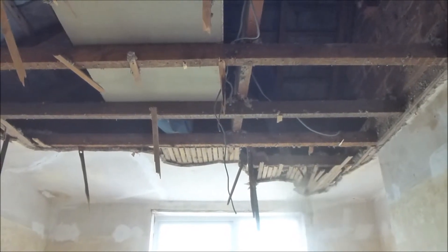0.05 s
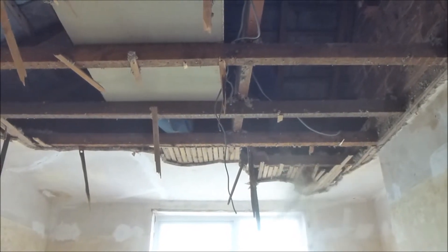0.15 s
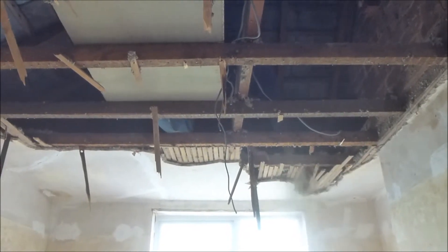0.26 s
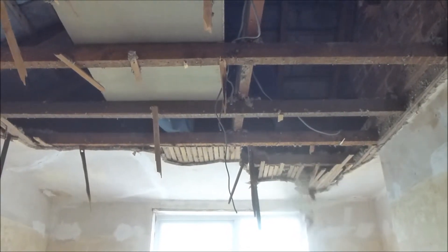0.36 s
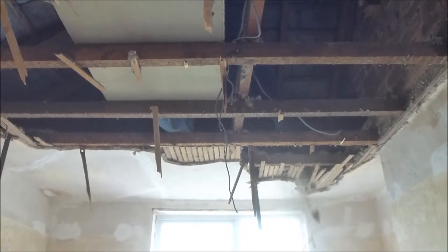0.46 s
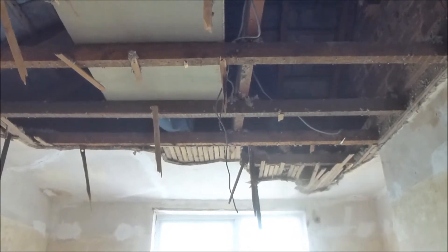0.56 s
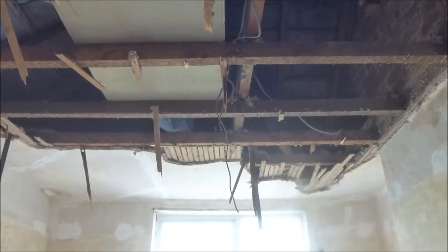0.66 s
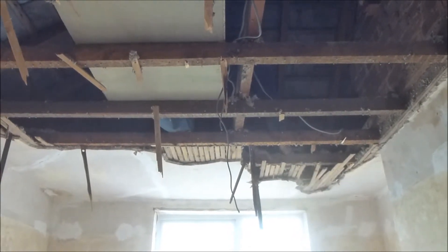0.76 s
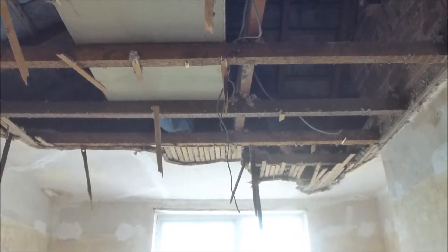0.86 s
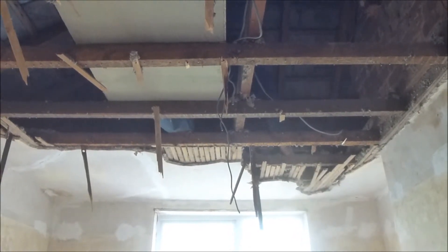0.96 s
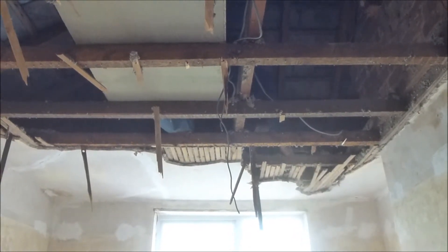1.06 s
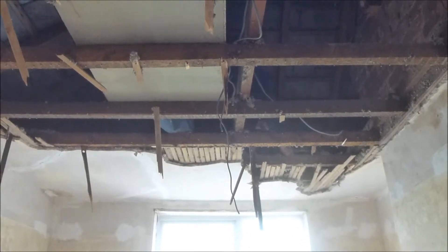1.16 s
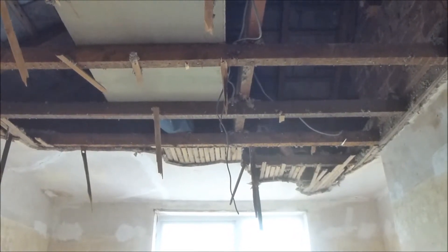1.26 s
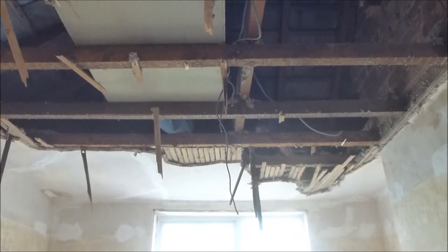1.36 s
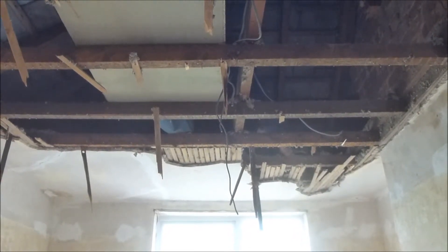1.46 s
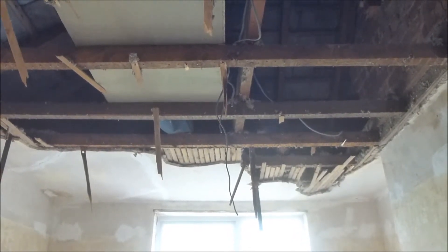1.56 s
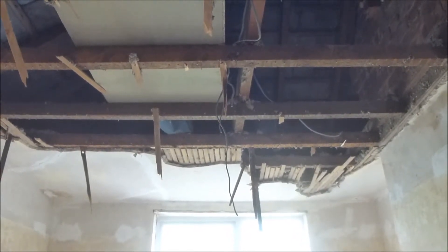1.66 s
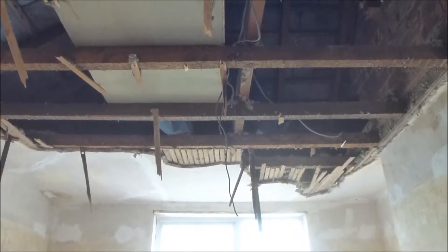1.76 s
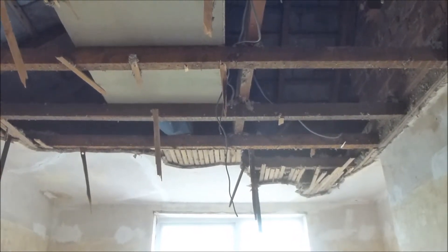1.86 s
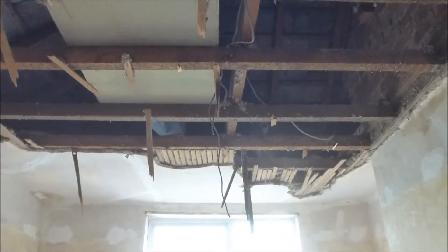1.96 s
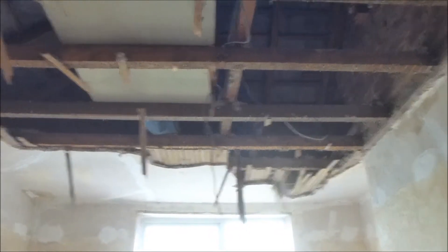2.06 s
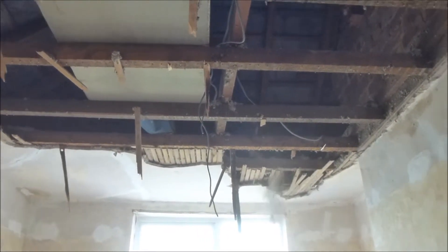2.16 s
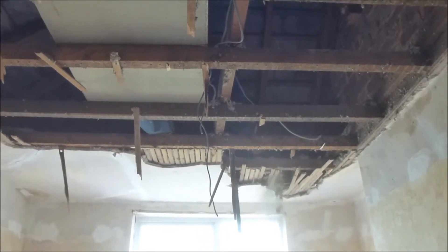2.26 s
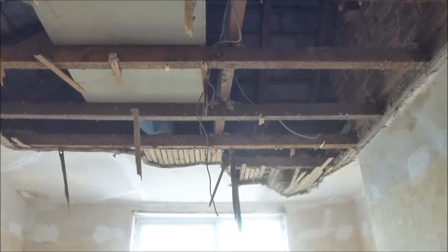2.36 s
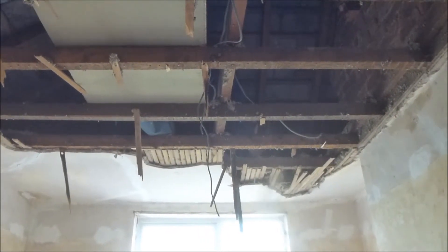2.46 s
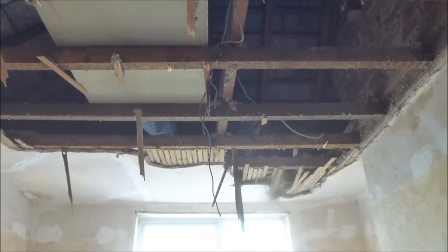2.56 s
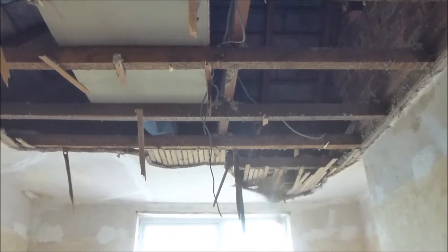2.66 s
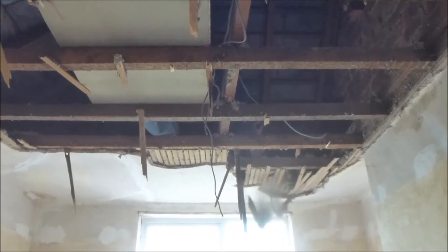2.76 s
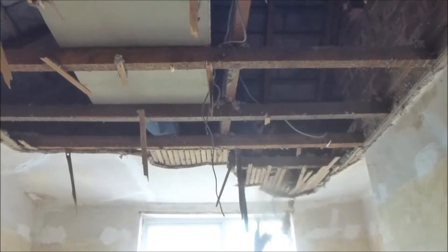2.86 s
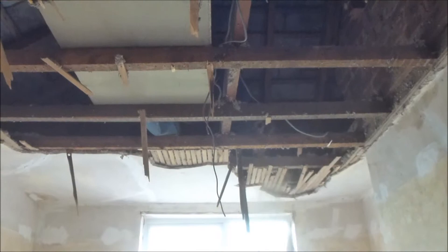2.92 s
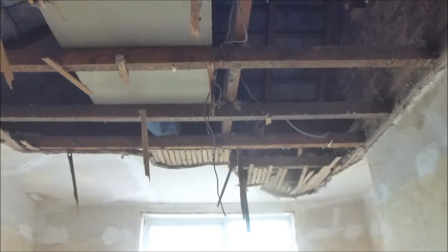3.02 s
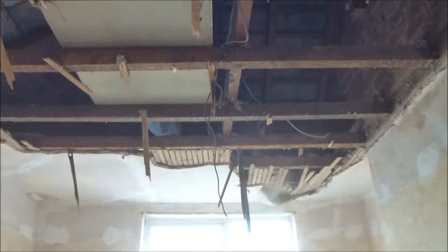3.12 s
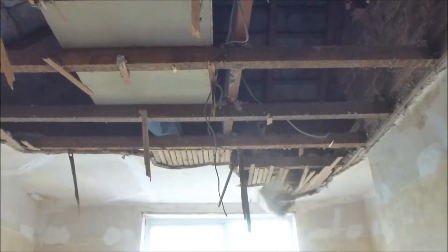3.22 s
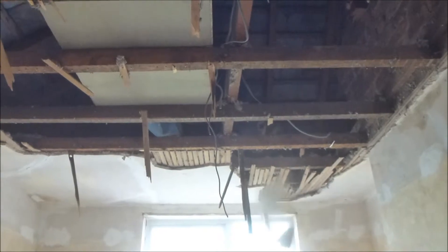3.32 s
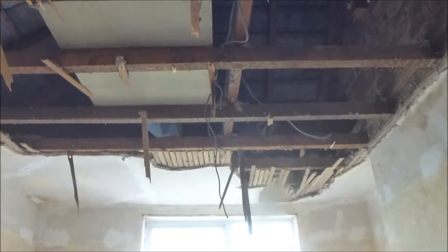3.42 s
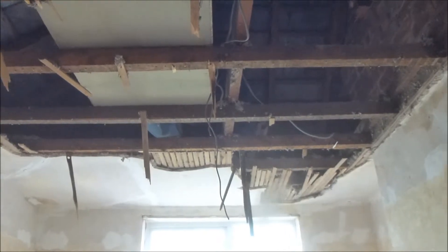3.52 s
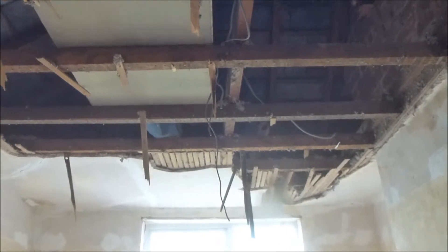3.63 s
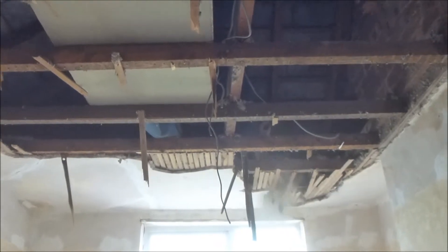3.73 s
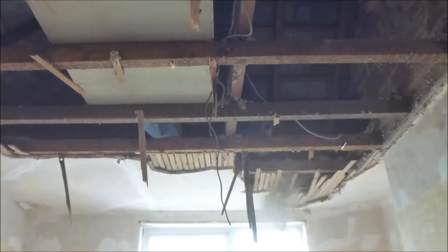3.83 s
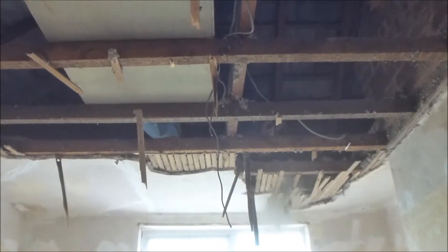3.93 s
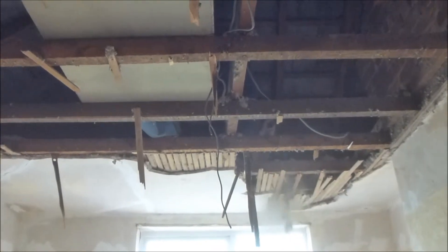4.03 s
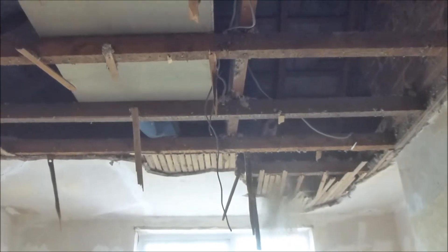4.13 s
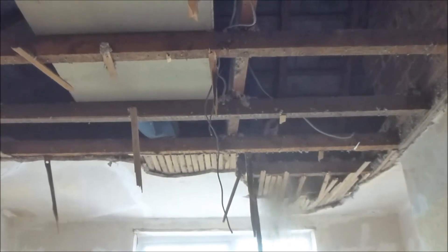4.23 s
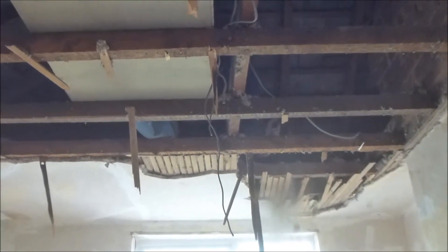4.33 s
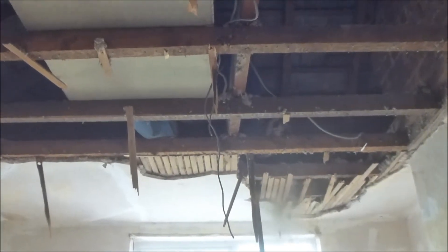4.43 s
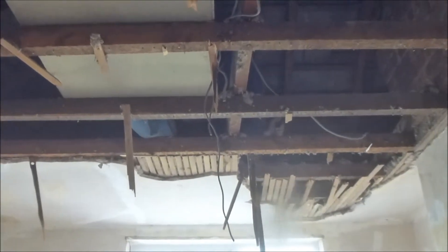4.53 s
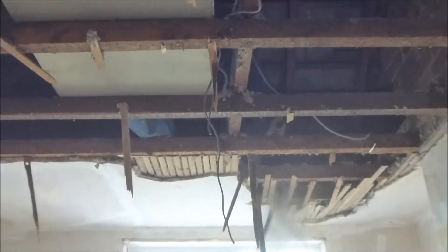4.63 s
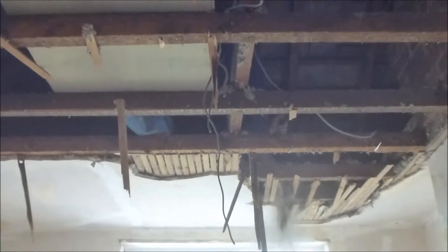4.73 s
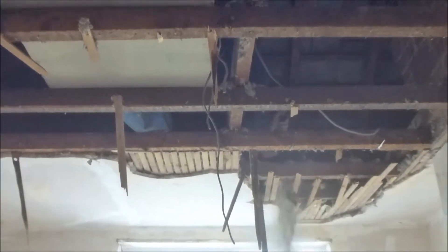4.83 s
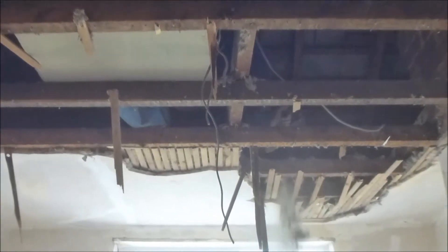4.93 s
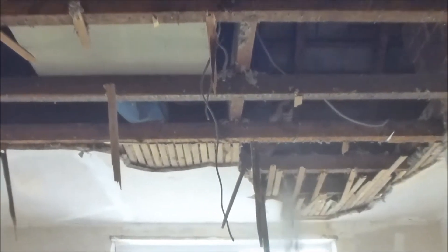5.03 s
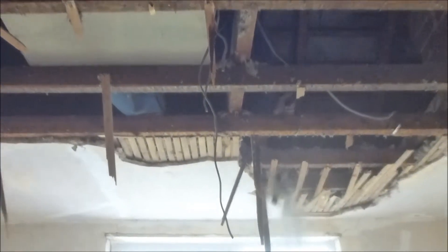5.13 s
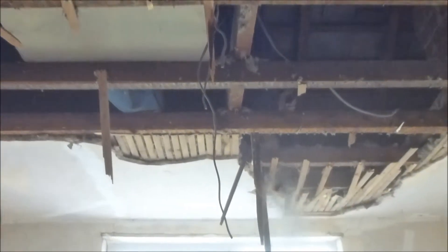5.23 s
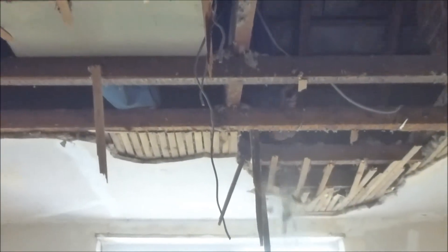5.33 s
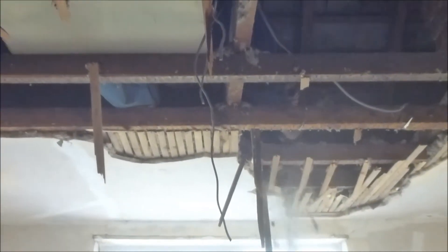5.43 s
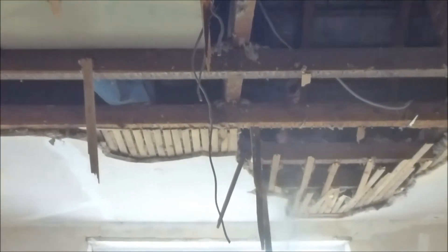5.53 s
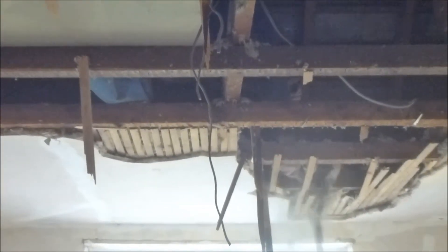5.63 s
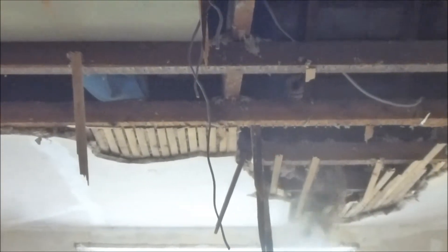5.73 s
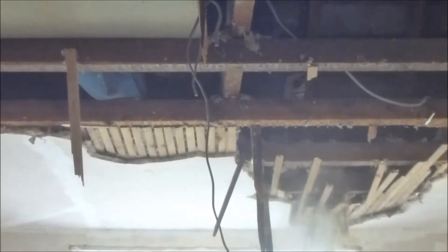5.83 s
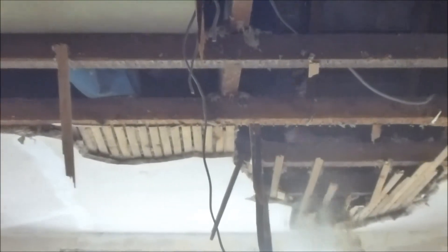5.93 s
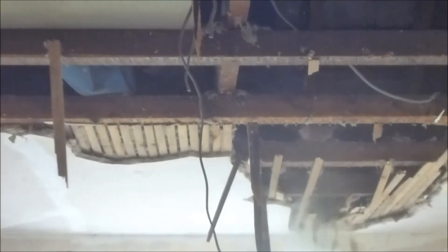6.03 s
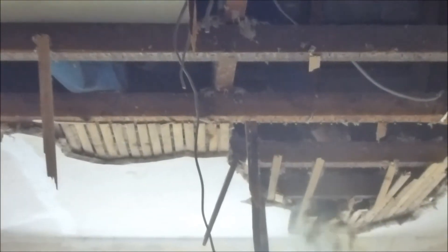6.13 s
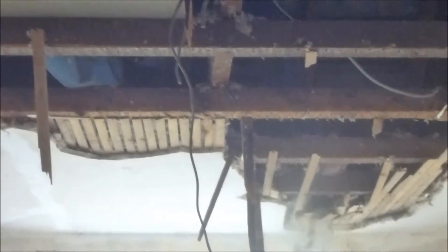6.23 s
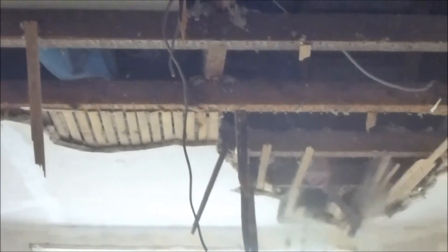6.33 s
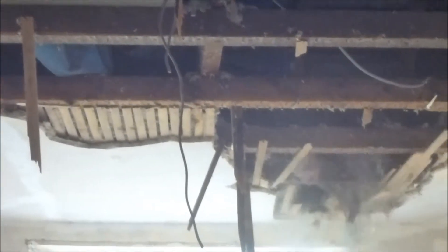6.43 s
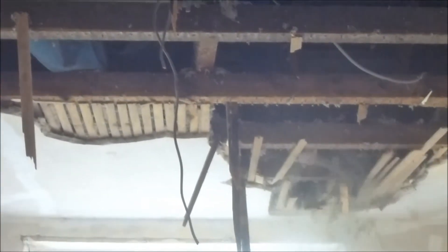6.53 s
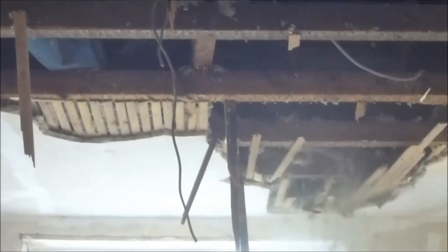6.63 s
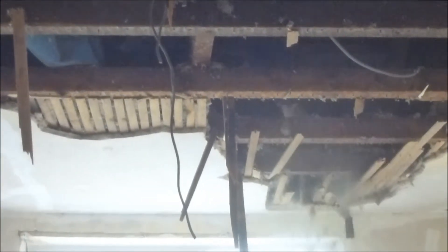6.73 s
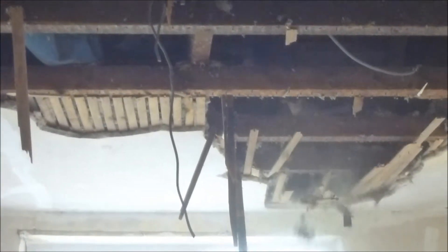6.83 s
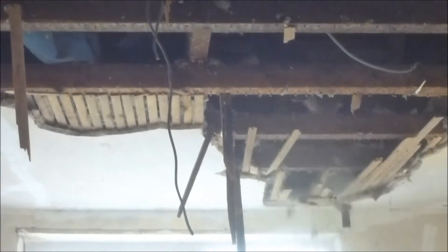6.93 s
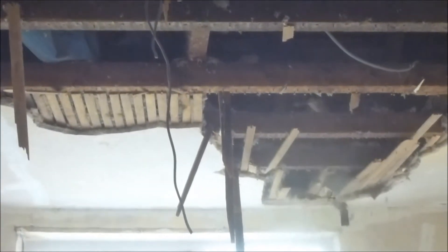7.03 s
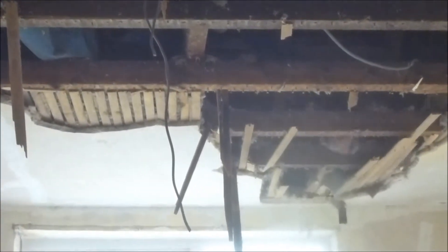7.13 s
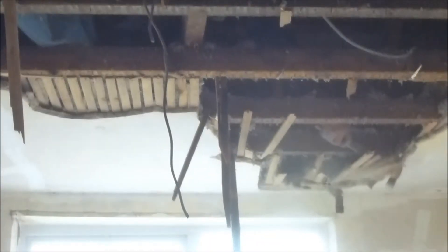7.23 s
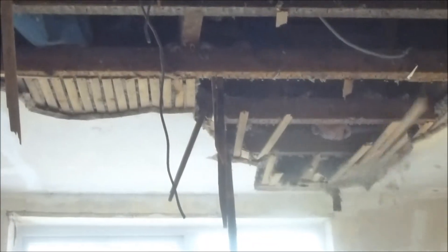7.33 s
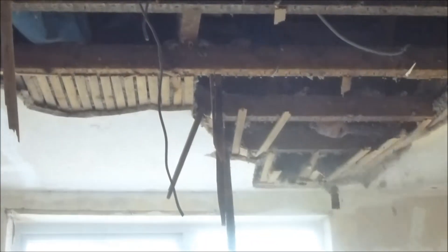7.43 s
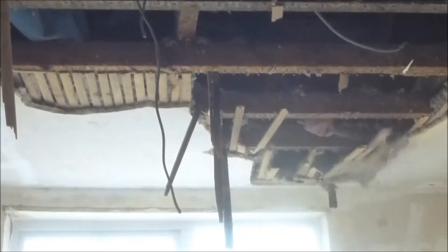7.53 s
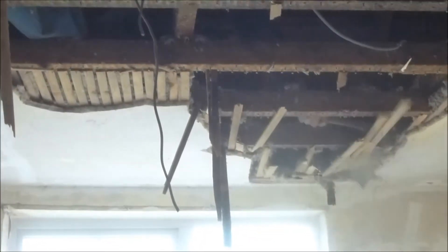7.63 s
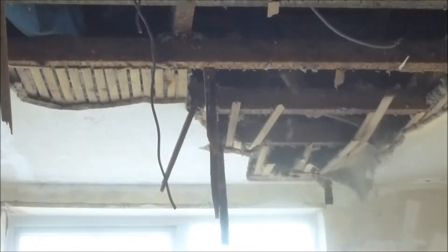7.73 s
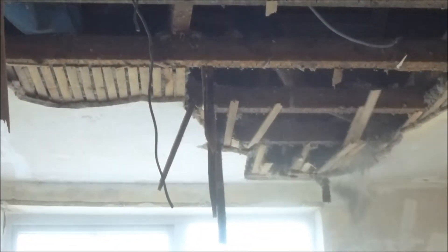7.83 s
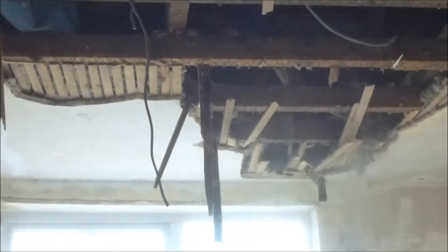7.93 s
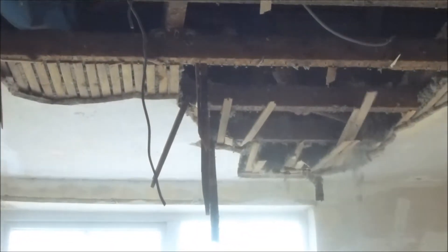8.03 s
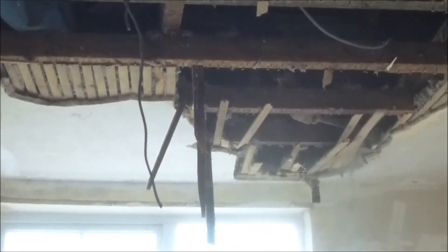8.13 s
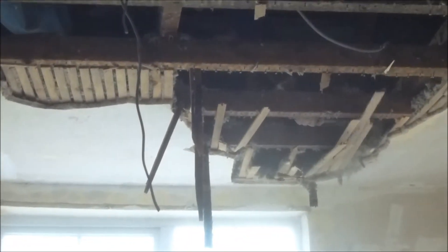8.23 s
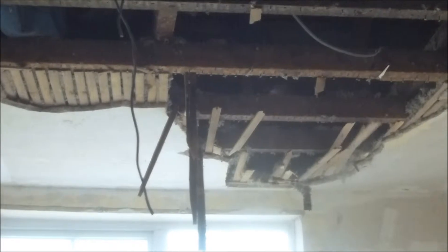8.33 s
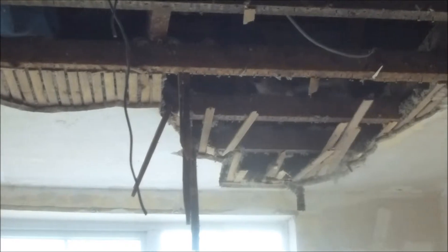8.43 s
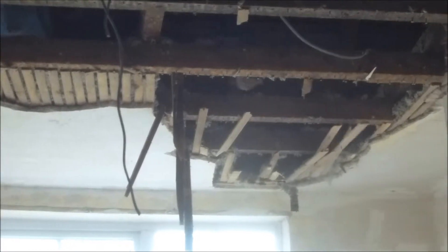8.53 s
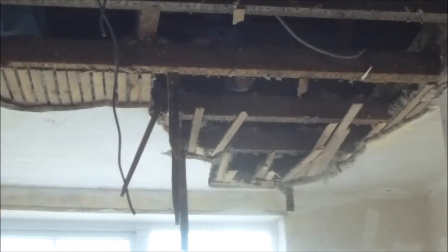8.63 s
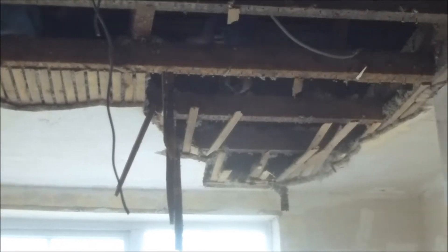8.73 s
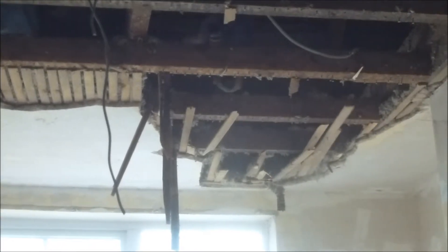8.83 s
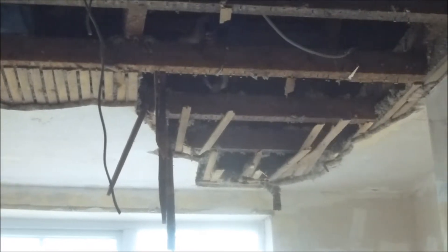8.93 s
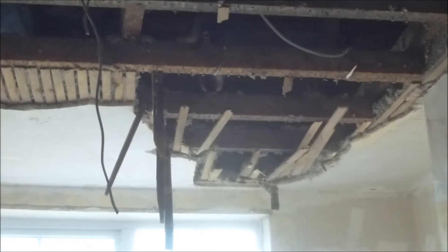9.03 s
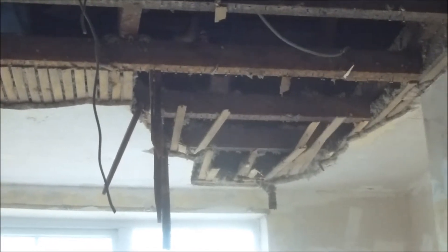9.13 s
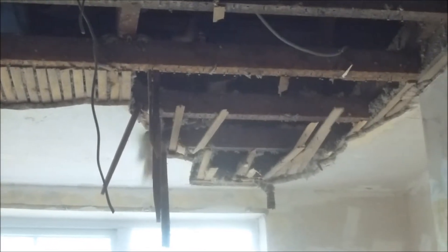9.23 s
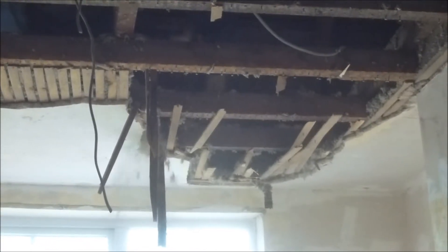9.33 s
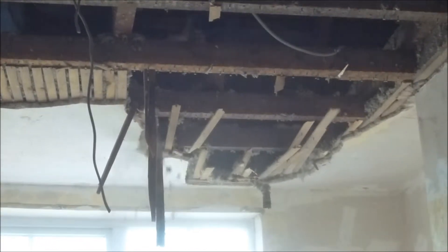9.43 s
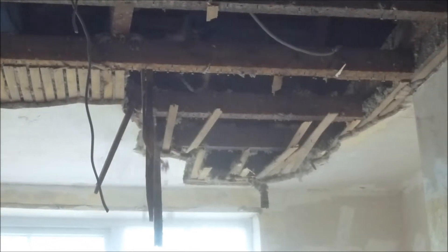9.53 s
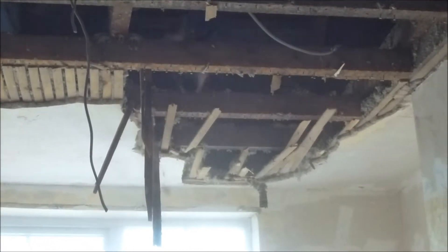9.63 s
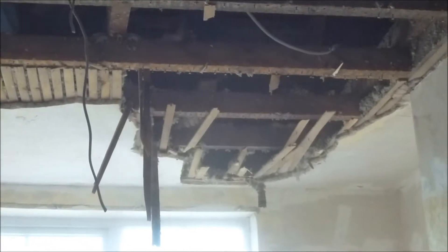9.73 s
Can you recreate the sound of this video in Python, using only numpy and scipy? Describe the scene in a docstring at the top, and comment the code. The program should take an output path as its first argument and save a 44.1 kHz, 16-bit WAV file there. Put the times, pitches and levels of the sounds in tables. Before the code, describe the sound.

Old wooden laths crack and splinter off ceiling joists in a bare, echoing room while plaster lumps thud down and grit trickles after them.

```python
"""Wooden laths are prised off the ceiling joists of a bare room with a long bar: they snap and splinter.
Each snap is a clumpy cloud of tiny breaks, filtered to the colour of breaking wood.
Lumps of plaster thud on the floor, made likewise with a dull knock, and grit trickles after them.
Loose wood, nails and the bar add short rings made of fading sine waves.
Sliding notes make a faint bird and low hums, over a quiet background of coloured noise."""
import sys
import numpy as np
from scipy import signal
from scipy.fft import rfft, irfft, next_fast_len
from scipy.io import wavfile
from scipy.ndimage import uniform_filter1d

SR = 44100
rng = np.random.default_rng(int(sys.argv[2]) if len(sys.argv) > 2 else 0)


def wav_out(sig):
    """Save sig, one row per channel (or a flat mono array), as 16-bit PCM at SR to the path in sys.argv[1]."""
    wavfile.write(sys.argv[1], SR, np.round(np.clip(np.atleast_2d(sig).T, -1, 1) * 32767).astype(np.int16))


N = 430857  # length of the scene (samples)
SIZE = 8192  # length of one short sound (samples)
T, HZ = np.arange(SIZE) / SR, np.fft.rfftfreq(SIZE, 1 / SR)
LEAD_S = 0.008  # a break starts this long before its main blow (s)
DEBRIS_DB = 21.0  # lifts all laths and lumps together (dB)

# all table levels are relative: later gains and the room change them
# plaster landing: (time [s], level [dB], floor boom [dB against level], shattering grit [dB against level],
# knock frequency [Hz], crumbling time [s])
LUMPS = [(0.004, -24.5, -21, -8.5, 440, 0.0043), (0.057, -22, -18, -18, 270, .018),
         (0.243, -8, -18, -51, 574, 0.017), (0.828, -17, -17, -10, 660, 0.011),
         (0.849, -19.5, -15.5, -8.5, 403, 0.023), (1.774, -30, -26, -13, 542, 0.046),
         (2.628, -14, -4.5, -35, 423, 0.011), (2.741, -18.5, -5, -11, 382, 0.007),
         (2.855, -20.5, -19, -15, 1050, 0.052), (2.947, -17, -14, -11.5, 1110, 0.017),
         (3.218, -9.5, -8, -37, 503, .005), (3.36, -13, -7, -16, 990, .011),
         (3.38, -16.5, 3, -11.5, 202, 0.0066), (3.449, -16.5, -10, -13.5, 930, 0.073),
         (3.564, -19.5, -6, -13, 222, 0.022), (3.864, -9, -12, -18, 466, 0.015),
         (3.963, -19.5, -4.5, -9, 447, .025), (4.742, -30.5, -8, -26, 282, .008),
         (5.061, -13, -14, -6, 1010, 0.039), (5.552, -18.5, -13.5, -10, 960, 0.026),
         (5.589, -21, -13, -22, 490, 0.02), (6.565, -37.5, -6, -0.5, 440, 0.054),
         (7.061, -36, -2, 2, 300, .005), (7.157, -29.5, -16, -6, 970, 0.0065),
         (8.471, -10.5, -5, -15.5, 794, .008), (8.956, -17.5, -25, -20, 400, 0.024),
         (9.342, -23, -2.5, -26, 567, 0.021), (9.676, -19.5, -27, -14, 480, 0.026)]
# colour of breaking wood: (frequency [Hz], level per Hz [dB])
WOOD_COLOUR = [(35, -19.5), (70, -3.5), (170, 0.5), (300, -2), (470, 6), (1000, -3.5), (1600, -8.5),
               (3000, -13), (5000, -9.5), (8000, -11), (12000, -16), (16000, -25)]
# places along a breaking piece: (how much sooner each reaches the left microphone [s])
SPOT_LAGS = [1.2e-5, -1.2e-5, 2.2e-5, .6e-5]


def amp(db):
    """Turns decibels into a gain."""
    return 10 ** (np.asarray(db) / 20)


def unit(x):
    """Scales a sound to an energy of one."""
    return x / np.sqrt(np.sum(x ** 2) + 1e-20)


def read(points, hz):
    """Reads between the points of a table, on a log-frequency axis."""
    f, value = np.transpose(points)
    return np.interp(np.log(hz + 1), np.log(np.sort(f) + 1), value)


def add(mix, s, sound):
    """Mixes a sound in at time s."""
    start = max(round(s * SR), 0)
    part = mix[..., start:][..., :sound.shape[-1]]
    part += sound[..., :part.shape[-1]]


def bump(hz, centre_hz, width_hz):
    """Outline of one resonance, 1 at its centre."""
    return 1 / (1 + (2 * (hz - centre_hz) / width_hz) ** 2)


def tinted(x, points):
    """Colours a long signal: strengthens or weakens each frequency."""
    size = next_fast_len(N)
    gain = amp(read(points, np.fft.rfftfreq(size, 1 / SR)))
    return irfft(rfft(x, size) * gain, size)[..., :N]


def paired(z, hz):
    """Makes two unrelated spectra a stereo pair: nearly alike in the bass, ever less so in the treble."""
    # likeness of left and right: (frequency [Hz], correlation [-1 to 1])
    likeness = [(60, 0.99), (250, 1), (500, 0.98), (1000, 0.89), (2000, 0.6), (4000, 0.35), (8000, 0.25),
                (14000, 0.18)]
    same = read(likeness, hz)
    mid = z[0] * np.sqrt((1 + same) / 2)
    side = z[1] * np.sqrt((1 - same) / 2)
    return np.array([mid + side, mid - side])


def room(x, direct_db, wet_db, lag_s):
    """The direct sound, then dense reflections off bare walls; the treble dies first."""
    # time to fade by 60 dB: (frequency [Hz], time [s])
    fade_times = [(60, 0.76), (260, 0.75), (700, 0.56), (1840, 0.59), (4850, 0.51), (9000, 0.41),
                  (15000, 0.3)]
    # resonances of the room: (frequency [Hz], width [Hz], lift [dB])
    resonances = [(48, 10, 3), (125.4, 19, 6), (220, 67, 4.5), (305, 8.2, -2.5), (553, 15, -2)]
    # balance of the two sides: (frequency [Hz], left minus right [dB])
    balance = [(60, -1.3), (110, 1), (200, -1.5), (380, 0.5), (700, 0.05), (1290, 1.5), (2380, 2),
               (4400, 2), (8120, 1.0), (15000, 0.5)]
    build_s, early_db, early_s = 0.0015, 10.0, 0.042  # build-up time, early boost and how fast it wears off
    size = 4 * SIZE
    t, hz = np.arange(size) / SR, np.fft.rfftfreq(size, 1 / SR)

    # random single echoes, about 4000 a second
    echoes = rng.choice([-1., 1.], (2, size)) * (rng.random((2, size)) < 4000 / SR)
    echoes *= (1 - np.exp(-t / build_s)) * amp(early_db * np.exp(-t / early_s))
    # each frequency fades at its own pace
    f, at, z = signal.stft(echoes, SR, nperseg=256)
    fading = amp(-60 * at / read(fade_times, f)[:, None])
    tail = signal.istft(z * fading, SR, nperseg=256)[1][:, :size]
    lift_db = sum(db * bump(hz, centre_hz, width_hz) for centre_hz, width_hz, db in resonances)
    walls = paired(rfft(unit(tail)), hz) * np.sqrt(2) * amp(wet_db + lift_db)

    # a positive lag brings the direct sound to the left side first
    delay_s = 16 / SR + np.array([[-.5], [.5]]) * lag_s
    direct = amp(direct_db) * np.exp(-2j * np.pi * hz * delay_s)
    sides = amp(np.array([[.5], [-.5]]) * read(balance, hz))
    response = irfft((direct + walls) * sides)
    return signal.oaconvolve(x[None], response, axes=1)[:, :N]


def air():
    """The quiet steady background of the house: coloured noise on both sides."""
    # colour of the background: (frequency [Hz], level per Hz [dB])
    air_colour = [(15, -59), (25, -3), (161, -24), (229, 1.5), (285, -8.5), (405, -12), (545, -9.5),
                  (734, -10.5), (911, -9.5), (2350, -19.5), (4870, -21.5), (13200, -30.5), (16000, -60)]
    level_db = -56.5
    size = next_fast_len(N, True)
    spectra = rfft(rng.standard_normal((2, size)))
    noise = irfft(paired(spectra, np.fft.rfftfreq(size, 1 / SR)))
    return unit(tinted(noise[:, :N], air_colour)) * np.sqrt(2 * N) * amp(level_db)


def glides(notes, waver):
    """Soft, nearly pure notes that slide from one pitch to another with a slight waver."""
    out = np.zeros(N)
    for s, length_s, start_hz, end_hz, db in notes:
        n = int(length_s * SR)
        drift = uniform_filter1d(rng.standard_normal(SR), size=200)[:n]
        pitch_hz = np.linspace(start_hz, end_hz, n) * (1 + waver * drift)
        turns = np.cumsum(pitch_hz) / SR
        add(out, s, amp(db) * np.sin(2 * np.pi * turns) * signal.windows.tukey(n, .5))
    return out


def hums():
    """A faint low tone that comes and goes, sliding a little in pitch."""
    # (time [s], length [s], start pitch [Hz], end pitch [Hz], level [dB])
    hum_notes = [(1.5, .19, 215, 224, -50.5), (1.94, 0.12, 356, 344, -50.5), (2.42, 0.15, 229, 242, -55),
                 (8.17, 0.325, 200.6, 229, -45.5), (8.53, 0.22, 217, 217, -40)]
    return glides(hum_notes, waver=0.37)


def bird():
    """A bird chirps outside in short, quickly sliding notes."""
    # (time [s], length [s], start pitch [Hz], end pitch [Hz], level [dB])
    chirps = [(1.52, 0.045, 5120, 4620, -52), (1.58, .08, 4300, 3900, -55), (8.77, 0.068, 3700, 5100, -53),
              (8.80, 0.063, 5100, 4120, -53), (8.87, 0.069, 3850, 4230, -51),
              (9.17, 0.052, 3370, 4280, -57), (9.205, 0.018, 4960, 4820, -44)]
    return glides(chirps, waver=0.88)


def flow():
    """How much fine debris is falling: spills start, run and dry up; crumbs settle after each lump."""
    # loosened plaster pouring out of the ceiling: (time [s], length [s], level [dB])
    spills = [(0, 0.26, -34.5), (1.803, 0.23, -51), (3.447, 0.84, -38), (4.655, 0.091, -41),
              (5.64, 0.1, -40), (7.213, 0.63, -38.5)]
    rise_s, fade_db_per_s = 0.013, 99  # how a spill starts and dries up
    scatter_db, settle_db_per_s = -30.5, 46.5  # crumbs against their lump, and how fast they settle
    t = np.arange(0, N, 64) / SR
    power = np.zeros(len(t))
    for s, length_s, db in spills:
        rise = np.clip((t - s) / rise_s, 0, 1)
        overrun_s = np.maximum(t - s - length_s, 0)
        power += (rise * amp(db - fade_db_per_s * overrun_s)) ** 2
    for s, db, *_ in LUMPS:
        power += (t > s) * amp(db + scatter_db - settle_db_per_s * abs(t - s)) ** 2
    return np.interp(np.arange(N) / SR, t, np.sqrt(power))


def patter(colour, per_s, spread_db):
    """Random tiny impacts of one colour and many sizes."""
    sizes = amp(spread_db * np.minimum(rng.exponential(1, N), 4))
    ticks = rng.standard_normal(N) * sizes * (rng.random(N) < per_s / SR)
    return unit(tinted(ticks, colour)) * np.sqrt(N)


def grit():
    """Crumbs of plaster and a few splinters patter down, as loudly as the flow of debris sets."""
    # colour of the crumbs: (frequency [Hz], level per Hz [dB])
    crumb_colour = [(40, 0), (150, 2.5), (500, 13), (1200, 1.5), (3500, -3), (8000, -9), (16000, -22)]
    crumbs = amp(-6.0) * patter(crumb_colour, per_s=1500, spread_db=5.0)
    splinters = amp(-22.0) * patter(WOOD_COLOUR, per_s=270, spread_db=-1.0)
    return flow() * (crumbs + splinters)


def fracture(length_s, swell_s, blow_db, linger_db, clump_db, spread_db, per_s):
    """A clumpy cloud of tiny breaks: it swells to one main blow, dies fast and leaves stragglers."""
    shape, t = (len(SPOT_LAGS), SIZE), T - LEAD_S
    sizes = rng.standard_normal(shape) * amp(spread_db * np.minimum(rng.exponential(1, shape), 4))
    breaks = sizes * (rng.random(shape) < per_s / SR)
    knots = T[::96]
    clumps = amp(clump_db * np.interp(T, knots, rng.standard_normal(len(knots))))
    swell, after = np.exp(np.minimum(t, 0) / swell_s), np.maximum(t, 0)
    fade = np.exp(-after / length_s) + amp(linger_db) * np.exp(-after / 0.033)
    cloud = unit(breaks * clumps * swell * fade)
    cloud[rng.integers(len(cloud)), round(LEAD_S * SR)] += amp(blow_db)  # main blow at one place
    return unit(cloud)


def rings(blows, modes):
    """A short scraping blow on a free object rings its modes, the pitches at which it shakes by itself."""
    out = np.zeros((len(SPOT_LAGS), N))
    ring = sum(amp(db - 60 * T / t60) * np.sin(2 * np.pi * hz * T) for hz, db, t60 in modes)
    for s, db in blows:
        drive = fracture(0.01, swell_s=0.00058, blow_db=6.5, linger_db=-23,
                         clump_db=6.5, spread_db=1.5, per_s=5200)
        add(out, s - LEAD_S, amp(db) * signal.fftconvolve(drive, ring[None], axes=1))
    return out


def squeaking_nail():
    """A nail squeaks in the wood: its shank rings at one pitch."""
    # squeaks: (time [s], level [dB])
    squeaks = [(4.492, -31)]
    # mode of the shank: (frequency [Hz], level [dB], time to fade by 60 dB [s])
    shank = [(1424, 0, 0.052)]
    return rings(squeaks, shank)


def bouncing_nail():
    """A nail bounces and pings: small, stiff metal rings high."""
    # pings: (time [s], level [dB])
    pings = [(.364, -25.5), (.411, -18.5), (7.362, -22.5)]
    # modes of the nail: (frequency [Hz], level [dB], time to fade by 60 dB [s])
    nail = [(8050, -7, 0.045), (8360, -5.5, 0.03), (12200, -10, 0.003), (5470, 13, 0.00031)]
    return rings(pings, nail)


def slipping_bar():
    """The steel bar rings faintly as it slips, for longer than the wood does."""
    # slips: (time [s], level [dB])
    slips = [(1.166, -45), (1.293, -43.5)]
    # modes of the bar: (frequency [Hz], level [dB], time to fade by 60 dB [s])
    bar = [(2110, -6, 0.16), (2950, -0.5, 0.29), (3280, -4.5, 0.29), (4100, 1, 0.13), (5534, -8, .1),
           (6470, -4, 0.14)]
    return rings(slips, bar)


def scraping_bar():
    """The bar scrapes against nails and lath, which sets off short resonances."""
    # scrapes: (time [s], level [dB])
    scrapes = [(5.0, -32), (5.035, -30), (6.19, -55.5)]
    # resonances of the scrape: (frequency [Hz], level [dB], time to fade by 60 dB [s])
    scrape = [(2890, -9, .04), (3700, 5, 0.055), (4530, -10, .04), (5480, -2, 0.044), (6400, -5, .04)]
    return rings(scrapes, scrape)


def loose_strip():
    """A loose strip of lath clacks: thin wood rings briefly at several pitches."""
    # clacks: (time [s], level [dB])
    clacks = [(6.44, -19), (6.915, -19), (7.265, -35)]
    # modes of the strip: (frequency [Hz], level [dB], time to fade by 60 dB [s])
    strip = [(1633, -7, 0.081), (2030, -6.5, 0.033), (2540, -8, 0.054), (3004, -5.5, 0.078),
             (3580, -7.5, .04), (5550, -6.5, 0.034)]
    return rings(clacks, strip)


def lath_ends():
    """Broken lath ends knock on the floor and ring briefly."""
    # knocks: (time [s], level [dB])
    knocks = [(2.857, -25), (2.949, -20), (3.218, -22), (3.361, -22), (5.061, -21.5), (7.158, -33)]
    # modes of a lath end: (frequency [Hz], level [dB], time to fade by 60 dB [s])
    lath_end = [(974, 0.5, 0.033), (995, -5.5, 0.058), (1470, -7, 0.03), (1646, 2, 0.03)]
    return rings(knocks, lath_end)


def boards():
    """Debris drops on something hollow, perhaps loose boards: one pattern of modes, at varied pitches."""
    # thunks: (time [s], level [dB], pitch [Hz])
    thunks = [(0.298, -32.5, 240), (1.163, -32.5, 405), (1.774, -38, 580), (8.957, -25.5, 366),
              (8.975, -23, 318)]
    # modes: (multiple of the pitch [ratio], level [dB], time to fade by 60 dB [s])
    board = [(1, 0, 0.17), (1.12, -5.5, 0.1), (1.33, -19, .05)]
    out = np.zeros((len(SPOT_LAGS), N))
    for s, db, pitch_hz in thunks:
        modes = [(pitch_hz * multiple, mode_db, t60) for multiple, mode_db, t60 in board]
        out += rings([(s, db)], modes)
    return out


def piece(drive, colour_db, bands, levels_db, ripple_db, order):
    """Rings a piece of debris: its material's colour, chance resonances, and a strength in each register."""
    ripple = uniform_filter1d(uniform_filter1d(rng.standard_normal(len(HZ)), order), order)
    gain = amp(colour_db + ripple_db * ripple / ripple.std())
    push = rfft(drive)
    energy = np.sum(abs(push) ** 2, axis=0) * 2 / SIZE
    centres_hz = np.sqrt(np.prod(bands, 1))
    for _ in range(2):  # registers affect each other, so they are adjusted in two passes
        power = energy * gain ** 2
        lifts = [db - 10 * np.log10(power[(HZ > lo) & (HZ < hi)].sum())
                 for (lo, hi), db in zip(bands, levels_db)]
        gain = gain * amp(read(list(zip(centres_hz, lifts)), HZ))
    # choose the timing of each frequency so that the piece rings only after the blow
    log_gain = np.log(np.r_[gain, gain[-2:0:-1]] + 1e-7)
    causal = np.exp(np.conj(signal.hilbert(log_gain)))
    return irfft(push * causal[:len(HZ)])


def plaster():
    """Each lump knocks dully on the boards, and its fragments land just after it."""
    # colour of landing plaster: (frequency [Hz], level per Hz [dB])
    plaster_colour = [(35, -19), (70, -15.5), (140, -3), (300, 3.5), (480, 3), (750, 1), (1050, -1.5),
                      (1550, -4), (2200, -14), (4000, -26), (8000, -41.5), (16000, -51.5)]
    # registers for boom, level, clatter and grit: (low edge [Hz], high edge [Hz])
    lump_bands = [(60, 250), (280, 1200), (1300, 2600), (3500, 12000)]
    hollow_db = 7  # how far the knock stands out of the noise
    out = np.zeros((len(SPOT_LAGS), N))
    for s, db, boom_db, grit_db, knock_hz, crumble_s in LUMPS:
        drive = fracture(crumble_s, swell_s=0.0019, blow_db=-8.5, linger_db=-17.5,
                         clump_db=2.5, spread_db=2.5, per_s=2500)
        colour_db = read(plaster_colour, HZ) + hollow_db * bump(HZ, knock_hz, 0.16 * knock_hz)
        # smaller lumps knock higher and clatter more: 1 dB per octave above 500 Hz
        clatter_db = -9.5 + 1 * np.log2(knock_hz / 500)
        levels_db = db + np.array([boom_db, 0, clatter_db, grit_db])
        add(out, s - LEAD_S, piece(drive, colour_db, lump_bands, levels_db, ripple_db=2.5, order=20))
    return out * amp(DEBRIS_DB)


def laths():
    """Each lath tears fibre by fibre, rings briefly and jolts its joist."""
    # snaps: (time [s], level [dB], wood body [dB against level], splinter fizz [dB against level],
    # tearing time [s])
    snaps = [(0.101, -24.5, -6, -12, .004), (0.173, -9.5, -10.5, -9.5, 0.0077),
             (0.6075, -35.5, -7, 0, 0.016), (0.689, -25.5, -12.5, -9.5, 0.027),
             (0.719, -12, -7.5, -5, 0.0053), (0.928, -27.5, -28, -5.5, 0.038),
             (1.164, -29, 1, -0.5, 0.0036), (1.293, -28.5, -5, -16, 0.0035), (2.093, -8, -8, -9, 0.0055),
             (2.583, -16, 0, -4, 0.011), (2.598, -11.5, -6.5, -13, 0.0047), (2.721, -15.5, -3, -7, 0.018),
             (2.821, -30, -18, -3, 0.0096), (3.105, -8.5, -5.5, -11.5, 0.0068),
             (3.615, -10.5, -6.5, -16, 0.0053), (3.632, -11.5, -7, -7.5, 0.0093),
             (3.74, -16.5, -9.5, -20, 0.019), (4.13, -8, -15, -5, .005), (4.381, -35, -2, -9, 0.0095),
             (4.524, -28, -12.5, -21.5, 0.011), (4.607, -20.5, -7.5, -8.5, 0.035),
             (4.631, -10.5, -5.5, -7.5, 0.013), (4.836, -23, -4, -6, 0.016), (4.852, -18.5, -5, -6.5, 0.01),
             (4.994, -23, -7.5, -9, 0.018), (5.031, -20.5, -0.5, -12, 0.03),
             (5.134, -9.5, -22, -8.5, 0.012), (5.384, -29.5, 0.5, -8, 0.045),
             (5.476, -20, -2.5, -8.5, .027), (5.537, -16.5, -5.5, -25, 0.044),
             (5.647, -8, -17, -19, 0.0032), (5.662, -11, -21, -5, .004), (6.313, -13.5, -1, -10, 0.032),
             (6.376, -14, -8.5, -3.5, .03), (6.699, -32, -11, -9, 0.012), (6.912, -20, -10, -20, 0.022),
             (6.993, -28, -17, -3.5, 0.01), (7.094, -27.5, -1.5, -8, 0.0079),
             (7.207, -10.5, -6.5, -15, 0.014), (7.264, -19.5, -10, -13, 0.0069),
             (7.361, -18, -7, -12.5, .018), (7.505, -17.5, -8.5, -22, 0.012), (7.551, -24, 0, -24, 0.011),
             (7.767, -27.5, -9, -12, 0.0066), (7.855, -14.5, -7.5, -14, .012), (8.055, -37, 0.5, -9, 0.019),
             (8.099, -29.5, -3.5, -3, 0.015), (8.37, -42.5, -3, -5, 0.0092),
             (9.245, -10.5, -2.5, -15, 0.0029), (9.655, -32, -2, -4, 0.016), (9.748, -8, -6, -8, 0.0037)]
    # registers for thump, body, level and fizz: (low edge [Hz], high edge [Hz])
    snap_bands = [(70, 300), (300, 1300), (1500, 6500), (7000, 16000)]
    typical_hz, spread_octaves, ring_db = 2970, 0.56, 3  # pitch of the ring, its scatter and its strength
    out = np.zeros((len(SPOT_LAGS), N))
    for s, db, body_db, fizz_db, tear_s in snaps:
        drive = fracture(tear_s, swell_s=0.0013, blow_db=-27, linger_db=-24.0,
                         clump_db=3.5, spread_db=3.5, per_s=5000)
        ring_hz = typical_hz * 2 ** (spread_octaves * rng.standard_normal())
        colour_db = read(WOOD_COLOUR, HZ) + ring_db * bump(HZ, ring_hz, 0.13 * ring_hz)
        # a lath that holds on with more of its body jolts the joist harder
        thump_db = -11 + 0.76 * body_db
        levels_db = db + np.array([thump_db, body_db, 0, fizz_db])
        add(out, s - LEAD_S, piece(drive, colour_db, snap_bands, levels_db, ripple_db=2.0, order=60))
    return out * amp(DEBRIS_DB)


def scene():
    """Ceiling and floor are both heard with strong reflections off the walls, the ceiling a little more so."""
    background = air() + hums()
    chirping = room(bird(), direct_db=-6.0, wet_db=-1.0, lag_s=1e-5)
    trickle = room(grit(), direct_db=0.0, wet_db=3.5, lag_s=1e-5)
    metal = squeaking_nail() + bouncing_nail() + slipping_bar() + scraping_bar()
    floor = lath_ends() + boards() + plaster()
    ceiling = metal + loose_strip() + laths()
    underfoot = sum(room(spot, direct_db=1.5, wet_db=2.5, lag_s=lag) for spot, lag in zip(floor, SPOT_LAGS))
    overhead = sum(room(spot, direct_db=-2.0, wet_db=1.71, lag_s=lag) for spot, lag in zip(ceiling, SPOT_LAGS))
    return background + chirping + trickle + underfoot + overhead


def record(dry):
    """Rounds off the loudest peaks, then removes the highest treble."""
    limit, cut_hz = 0.95, 15950
    rounded = limit * np.tanh(dry / limit)
    low_pass = signal.firwin(401, cut_hz, window=("kaiser", 9), fs=SR)
    return signal.oaconvolve(rounded, low_pass[None], "same")


dry = scene()
out = record(dry)
wav_out(out)
```